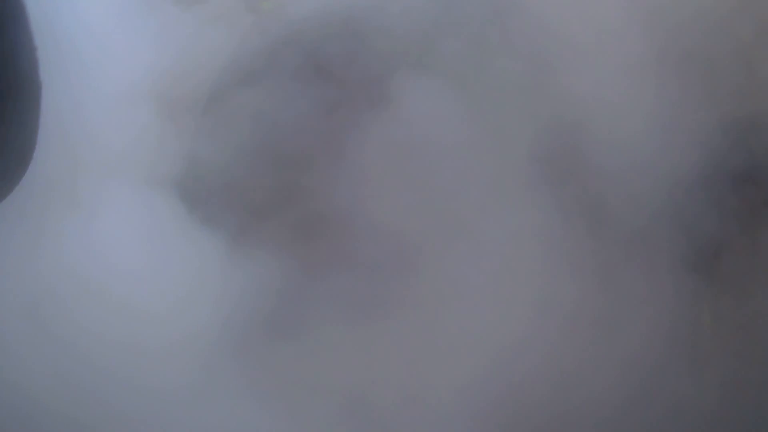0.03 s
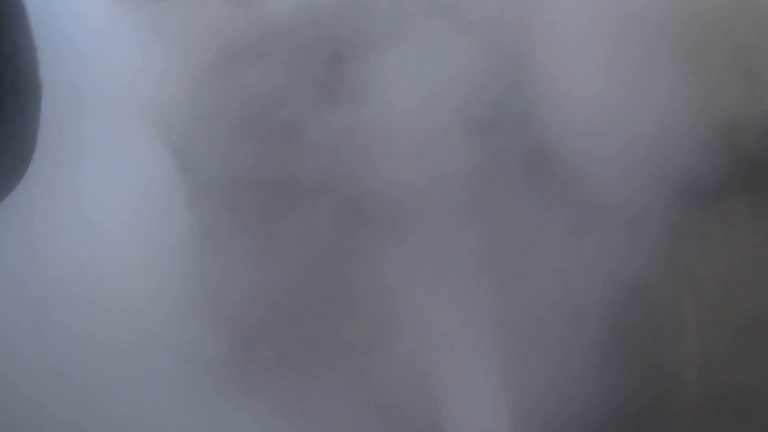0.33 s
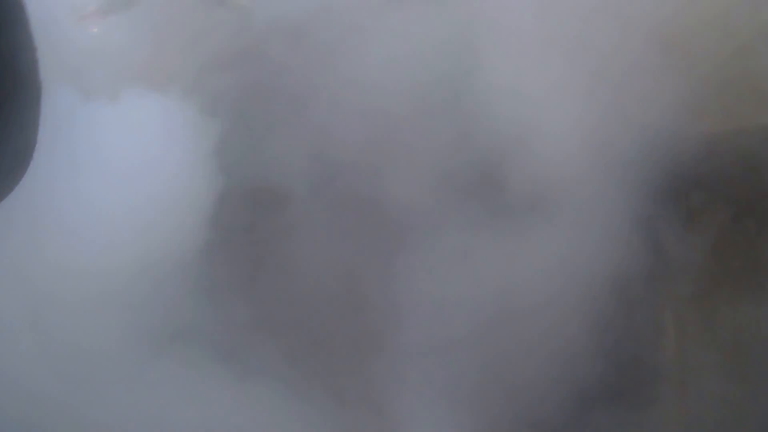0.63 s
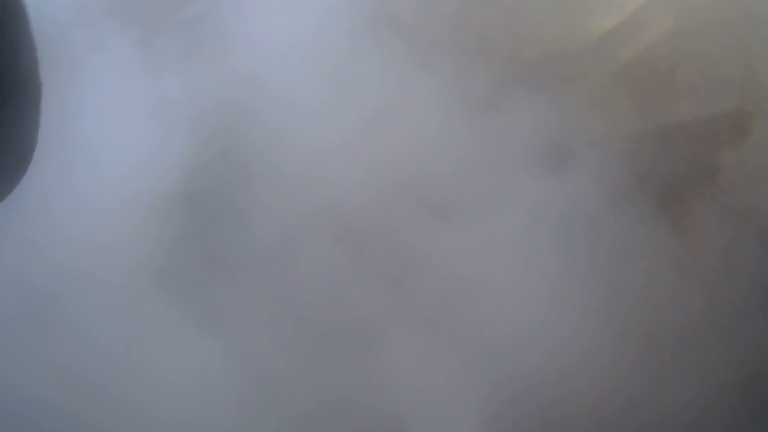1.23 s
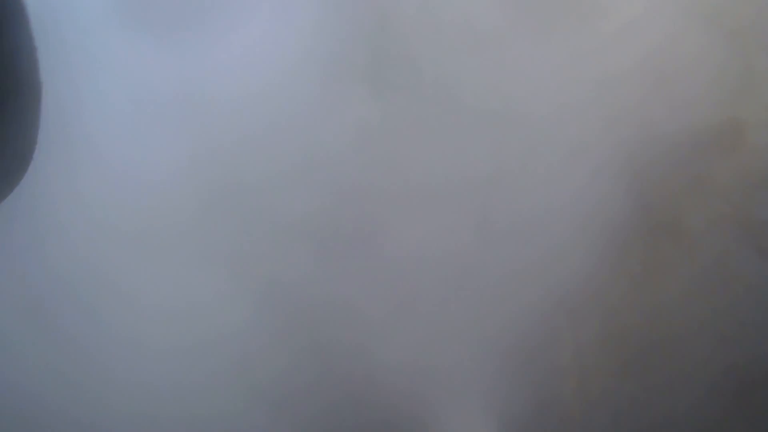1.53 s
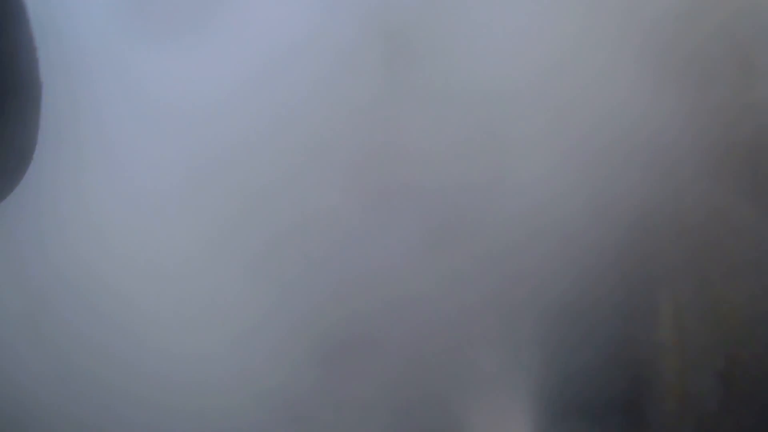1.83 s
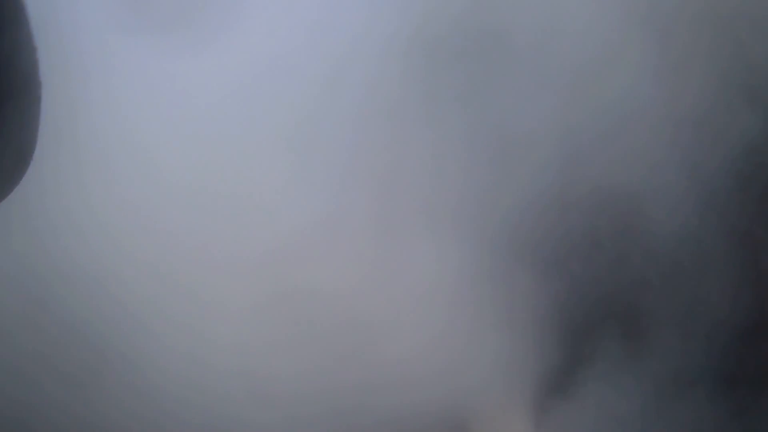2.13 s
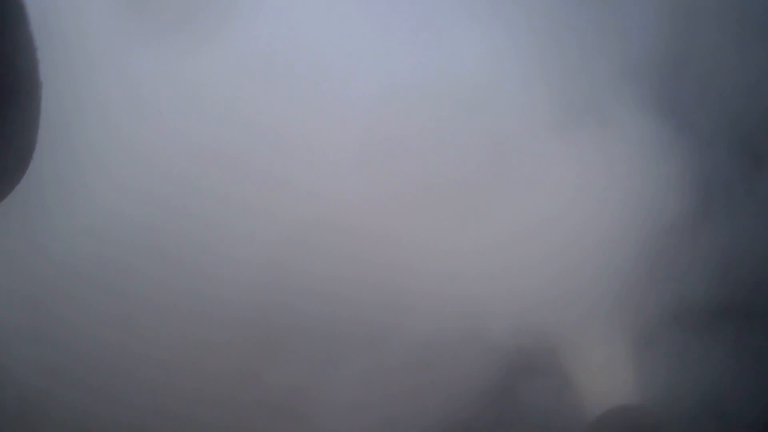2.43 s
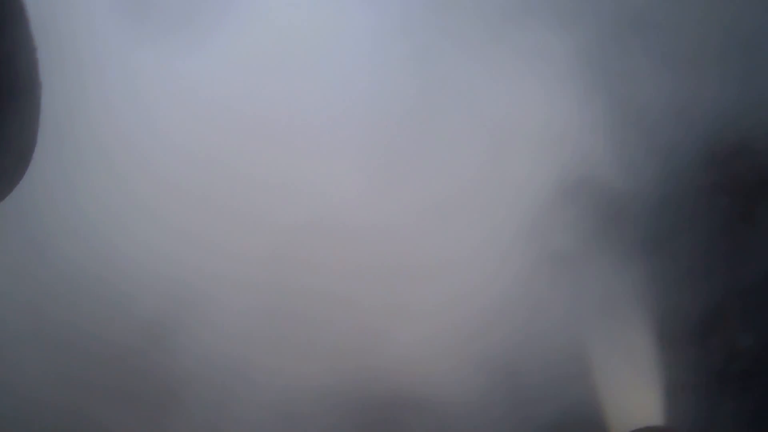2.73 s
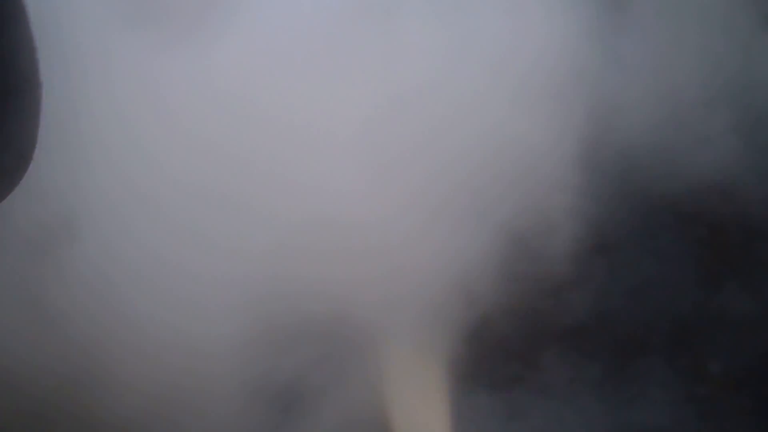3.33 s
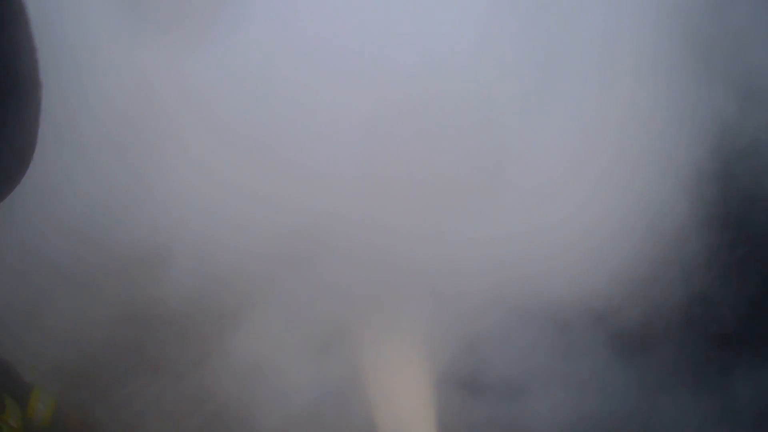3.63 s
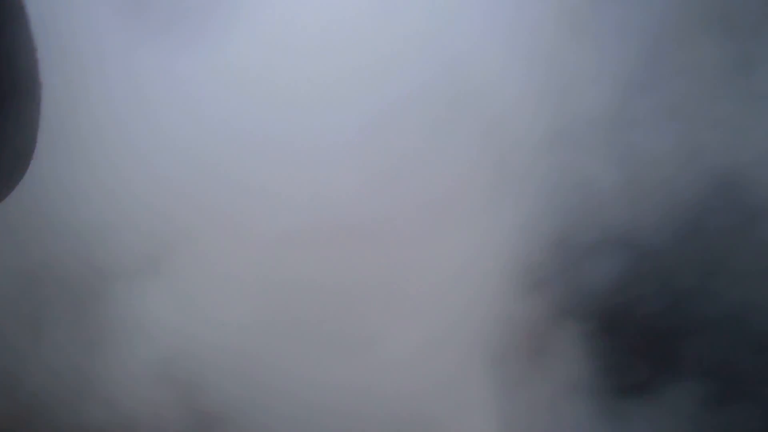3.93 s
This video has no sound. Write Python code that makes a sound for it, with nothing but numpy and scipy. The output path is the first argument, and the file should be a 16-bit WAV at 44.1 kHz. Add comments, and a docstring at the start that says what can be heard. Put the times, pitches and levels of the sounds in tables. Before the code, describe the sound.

A fire hose jet hisses steadily close by, with a low engine rumble underneath throughout. From about 1 to 1.9 seconds the water drums on a vehicle's hollow metal panels. Between 2 and 3.4 seconds it spatters and the hiss sharpens into a sizzle. Another short drumming comes at 3.5 seconds, then the spray falls away around 3.7 seconds and returns just before 4.

```python
"""Fire hose on a burning vehicle

The jet rushes steadily, a hiss of mist and droplets coloured by the housing of a camera close by.
Sweeping over the wreck, it drums on hollow body panels, splashes back and sizzles on new surfaces.
Near the end it falls away for a moment. An engine runs underneath."""
import sys
import numpy as np
from scipy import signal
from scipy.fft import rfft, irfft
from scipy.io import wavfile

SR = 44100
rng = np.random.default_rng(int(sys.argv[2]) if len(sys.argv) > 2 else 0)


def bounce(signal):
    """Save signal as a 16-bit WAV file at the path given by the first command-line argument."""
    frames = np.transpose(np.atleast_2d(signal))
    limited = np.clip(frames, -1, 1)
    pcm = np.round(limited * 32767).astype(np.int16)
    wavfile.write(sys.argv[1], SR, pcm)


N = 176400


def amp(db):
    """Decibels to gain."""
    return 10 ** (np.asarray(db) / 20)


def unit(x):
    """Scales to rms 1."""
    return x / np.sqrt(np.mean(x ** 2) + 1e-20)


def curve(points, t):
    """Reads a breakpoint envelope at times t."""
    return np.interp(t, *np.transpose(points))


def colour(x, points):
    """EQ drawn through points on a log-frequency axis; rms 1."""
    hz = np.fft.rfftfreq(N, 1 / SR)
    point_hz, point_db = np.transpose(points)
    eq_db = np.interp(np.log(hz + 1), np.log(point_hz + 1), point_db)
    return unit(irfft(rfft(x) * amp(eq_db), N))


def smooth(x, span):
    """Gaussian blur over span steps along the last axis; rms 1."""
    size = x.shape[-1]
    blur = np.exp(-2 * (np.fft.rfftfreq(size) * span) ** 2)
    return unit(irfft(rfft(x) * blur, size))


def impacts(per_s, spread_db):
    """Random clicks of water, mostly small, a few large; rms 1."""
    size = amp(spread_db * np.minimum(rng.exponential(1, N), 4))
    return unit(size * rng.choice([-1, 1], N) * (rng.random(N) < per_s / SR))


def gate(start, length, attack_s, release_s):
    """Attack, hold, release; halfway faded at start + length."""
    t = np.arange(N) / SR - start
    return np.clip(t / attack_s, 0, 1) * np.clip((length - t) / release_s + .5, 0, 1)


def spray():
    """Mist and droplets hiss together, fluttering as the jet breaks up."""
    # strength of the spray: time_s, relative_db
    strength = [(0, -30.5), (.15, -31), (.31, -33), (.45, -33), (.51, -30.5), (.62, -32), (.77, -30),
                (.87, -33.5), (1.1, -31.5), (1.27, -31), (1.42, -28), (1.5, -27.7), (1.74, -27.5),
                (1.94, -32), (2.06, -31), (2.5, -32), (2.7, -31.5), (2.98, -32), (3.07, -29), (3.32, -30),
                (3.41, -32), (3.5, -27.5), (3.658, -33.5), (3.685, -41), (3.82, -42.5), (3.86, -32),
                (3.91, -28), (4, -31.5)]
    # treble against the body of the spray: time_s, gain_db
    treble_ride = [(0, -1), (.35, -1), (.7, 0.5), (1.1, -1), (1.6, -4), (2.0, 1.5), (2.45, 0.5), (2.57, -1),
                   (2.72, 1), (3.0, 0), (3.1, 0.5), (3.38, 1), (3.52, -3.5), (3.65, -2), (3.77, -5.5),
                   (3.85, 0), (3.92, -5.5), (4, -1.5)]
    # the hiss, with the broad resonances of the housing: frequency_hz, relative_db
    hiss_eq = [(110, -26), (200, -9.5), (300, -2), (470, -4), (700, -11.5), (920, -19), (1250, -11.5),
               (1620, -2.5), (2010, 1.5), (2520, -6.5), (2950, -15), (3280, -25.5), (3850, -13),
               (4280, -10), (4700, -15.5), (5230, -28.5), (5950, -14), (6450, -13), (7050, -13),
               (7500, -21), (8050, -18), (8350, -26.5), (8700, -36), (9200, -33), (10000, -24.5),
               (10600, -30), (11600, -33.5), (12350, -30.5), (13250, -34.5), (13800, -23), (14380, -18.5),
               (14850, -23), (15250, -31), (15900, -38)]
    flutter_s, flutter_db = 0.017, 0.36
    patch_s, patch_hz, patch_db = 0.045, 900, 0.8
    shelf_hz, trim_db = 3060, 1.5
    mist = rng.standard_normal(N)
    droplets = amp(-7) * impacts(per_s=2200, spread_db=3.5)
    hz, t, bands = signal.stft(colour(mist + droplets, hiss_eq), SR, nperseg=256, noverlap=192)
    # small patches of the spectrum swell and sink at random
    patches = smooth(rng.standard_normal((len(t), len(hz))).T, patch_s / t[1])
    patches = smooth(patches.T, patch_hz / hz[1]).T
    flutter = smooth(rng.standard_normal(len(t)), flutter_s / t[1])
    shelf = 1 - 1 / (1 + (hz / shelf_hz) ** 6)
    treble_db = shelf[:, None] * curve(treble_ride, t)
    gain_db = trim_db + curve(strength, t) + treble_db + flutter_db * flutter + patch_db * patches
    return signal.istft(bands * amp(gain_db), SR, nperseg=256, noverlap=192)[1][:N]


def panels():
    """Slugs of water beat on sheet metal, which answers with a short hollow ring."""
    # the jet crosses a panel: start_s, length_s, level_db, ring_hz, width_hz
    crossings = [(0.647, .16, -42, 313, 260), (1.054, 0.21, -27.5, 425, 306), (1.282, 0.16, -26, 400, 280),
                 (1.44, 0.22, -28.5, 379, 383), (1.638, 0.15, -26, 428, 271), (1.787, 0.087, -29, 373, 300),
                 (2.113, 0.61, -40, 403, 507), (3.125, 0.44, -49, 457, 300), (3.422, 0.16, -28, 482, 122),
                 (3.912, .15, -35.5, 477, 240)]
    cutoff_hz = 576
    hz = np.fft.rfftfreq(N, 1 / SR)
    lowpass = 1 / np.sqrt(1 + (hz / cutoff_hz) ** 16)
    out = np.zeros(N)
    for start, length, db, ring_hz, width_hz in crossings:
        slugs = impacts(per_s=650, spread_db=1.5)
        ring = 1 / (1 + 1j * (hz ** 2 - ring_hz ** 2) / ((hz + 1) * width_hz)) ** 2
        drum = unit(irfft(rfft(slugs) * ring * lowpass, N))
        out += amp(db) * gate(start, length, attack_s=0.016, release_s=0.078) * drum
    return out


def splashes():
    """Dense spatter where the jet rebounds off the wreck."""
    # bursts of splashing: start_s, length_s, level_db
    bursts = [(0.577, 0.16, -39.5), (1.1, 0.75, -50.5), (2.264, .52, -36), (3.484, 0.2, -43)]
    # tone of the spatter: frequency_hz, relative_db
    spatter_eq = [(200, -47), (500, 2.5), (720, 2), (950, -13), (1300, 3.5), (1700, -7), (3300, -14),
                  (4350, -10), (5300, -20), (15000, -37)]
    fade_s = 0.091
    envelope = sum(amp(db) * gate(start, length, fade_s, fade_s) for start, length, db in bursts)
    return envelope * colour(impacts(per_s=3000, spread_db=1), spatter_eq)


def sizzles():
    """The hiss sharpens as the jet finds new surfaces."""
    # swells of bright noise: start_s, length_s, level_db, centre_hz, width_hz
    swells = [(2.1, 0.92, -42.5, 4380, 600), (2.63, 0.14, -37, 4220, 610), (2.63, .17, -46, 14400, 800),
              (2.926, 0.52, -46.5, 7240, 1810)]
    hz = np.fft.rfftfreq(N, 1 / SR)
    out = np.zeros(N)
    for start, length, db, centre_hz, width_hz in swells:
        bandpass = 1 / (1 + (2 * (hz - centre_hz) / width_hz) ** 4)
        hiss = unit(irfft(rfft(rng.standard_normal(N)) * bandpass, N))
        out += amp(db) * gate(start, length, attack_s=0.098, release_s=0.098) * hiss
    return out


def engine():
    """Low tones waver with the engine's turning rate over a bed of rumble."""
    # engine tones: multiple of the turning rate, level_db
    orders = [(2, -58.5), (3, -48), (4, -55.5), (5, -51), (6.3, -50.5)]
    # tone of the rumble: frequency_hz, relative_db
    rumble_eq = [(20, -11.5), (60, -13.5), (100, -7.5), (125, 1.5), (165, -2.5), (230, -2.5), (330, -5.5),
                 (480, -11), (900, -27), (10000, -88)]
    # swell of the rumble: time_s, level_db
    rumble_ride = [(0, -40), (.95, -37.5), (1.4, -37.5), (2.1, -38), (3.5, -37), (3.75, -35), (4, -38)]
    turning_hz, wander_depth = 28.77, 0.0084
    wander = smooth(rng.standard_normal(N), .25 * SR)
    turns = np.cumsum(turning_hz * (1 + wander_depth * wander)) / SR
    tones = sum(amp(db) * np.sqrt(2) * np.sin(2 * np.pi * (order * turns + rng.random()))
                for order, db in orders)
    rumble = colour(rng.standard_normal(N), rumble_eq)
    return tones + amp(curve(rumble_ride, np.arange(N) / SR)) * rumble


def scene():
    """Water and engine, mixed in mono."""
    return (spray() + sizzles() + panels() + splashes() + engine())[None]


def record(dry):
    """The camera's band limit cuts off the very top of the hiss."""
    cutoff_hz = 15850
    lowpass = signal.firwin(1023, cutoff_hz, window=("kaiser", 9), fs=SR)
    return signal.oaconvolve(dry, lowpass[None], "same")


dry = scene()
out = record(dry)
bounce(out)
```